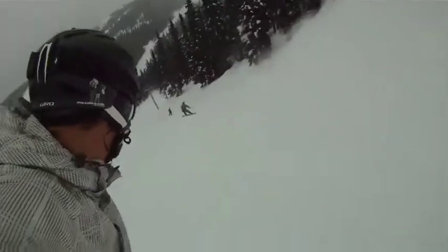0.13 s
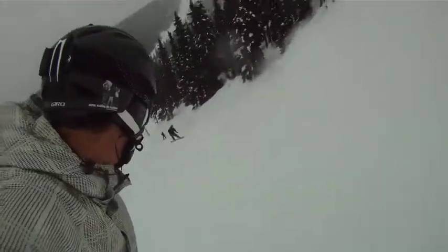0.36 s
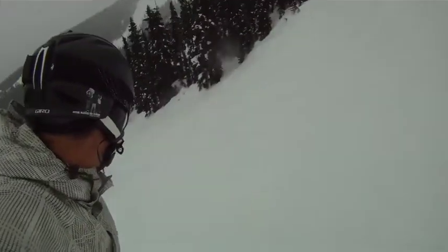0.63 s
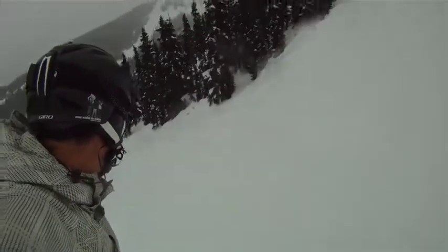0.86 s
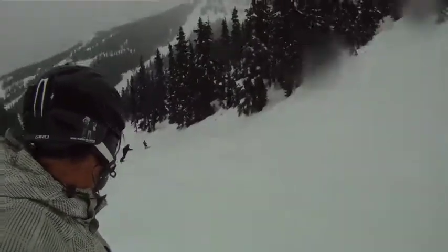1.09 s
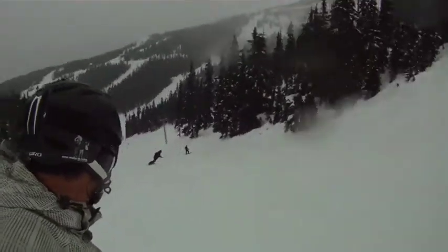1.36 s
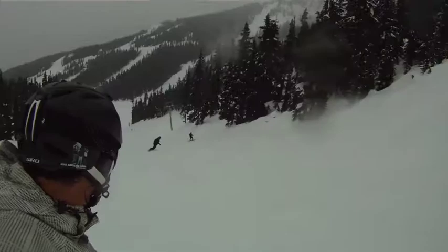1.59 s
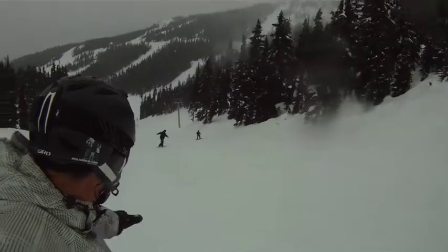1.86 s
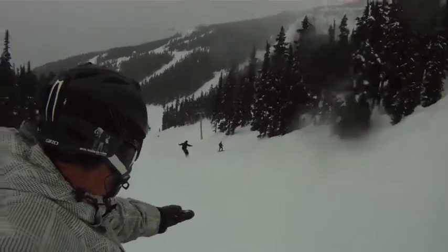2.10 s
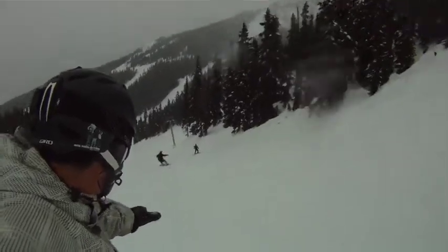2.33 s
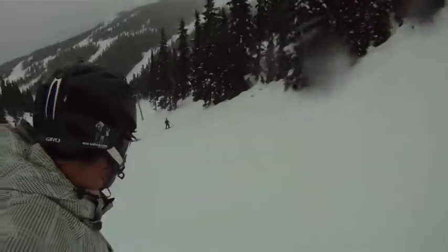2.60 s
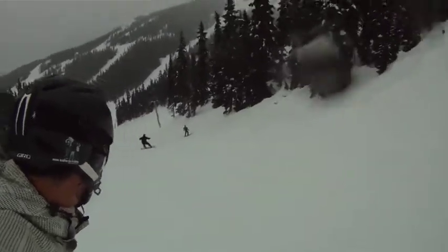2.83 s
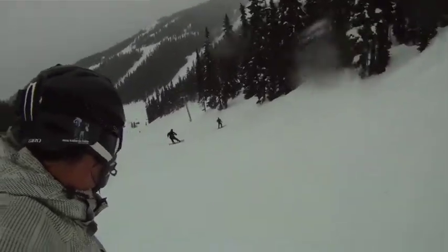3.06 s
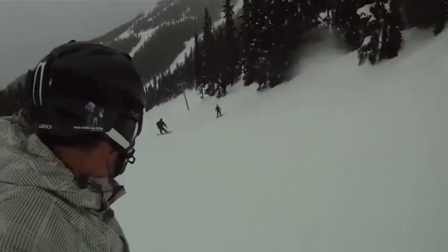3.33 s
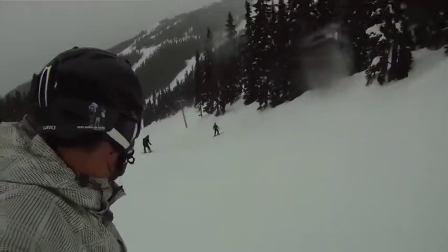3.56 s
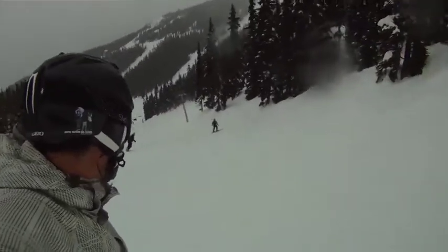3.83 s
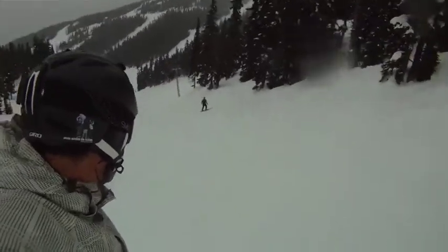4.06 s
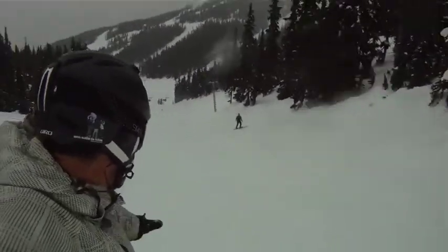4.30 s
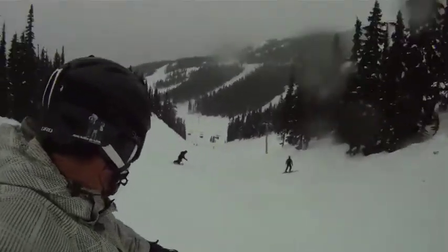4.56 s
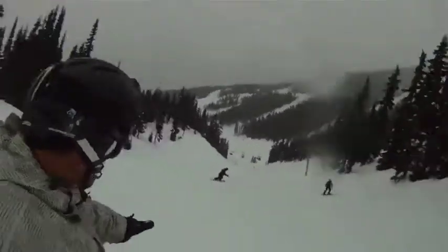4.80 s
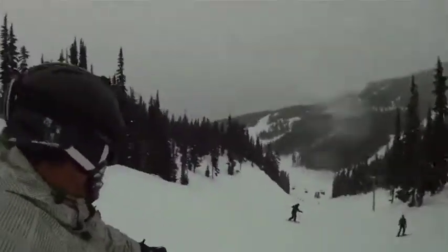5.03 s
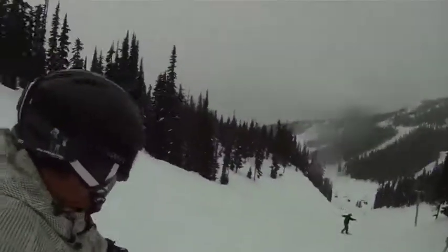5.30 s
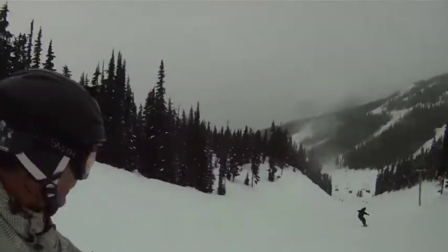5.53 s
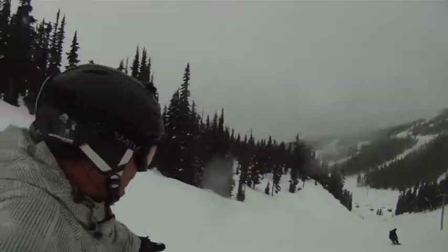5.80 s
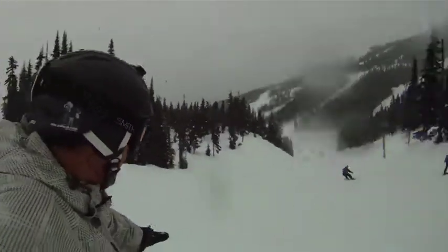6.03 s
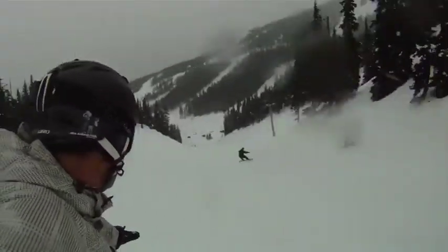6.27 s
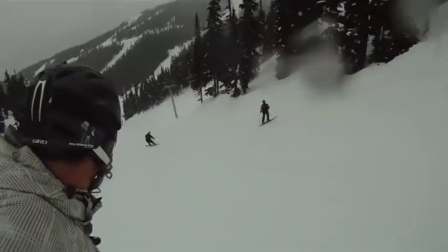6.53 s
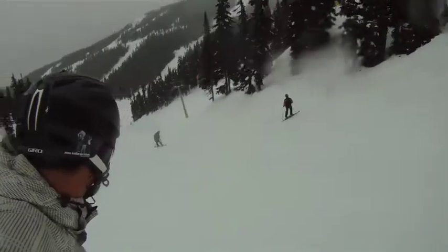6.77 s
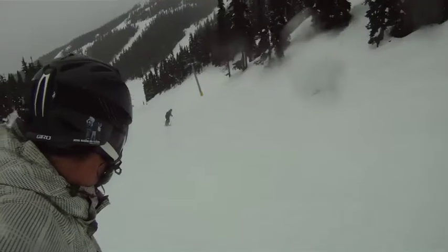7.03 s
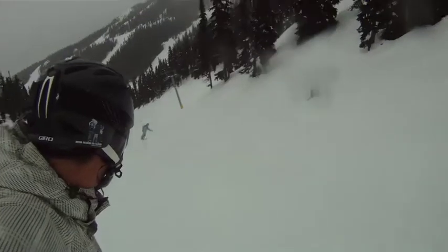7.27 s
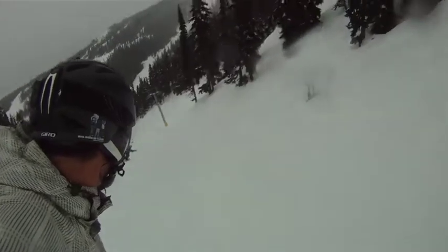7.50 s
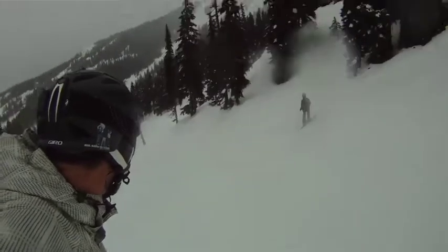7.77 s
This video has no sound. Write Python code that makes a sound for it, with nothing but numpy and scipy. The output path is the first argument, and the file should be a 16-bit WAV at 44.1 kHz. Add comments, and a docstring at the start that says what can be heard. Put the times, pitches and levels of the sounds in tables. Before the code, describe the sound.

A board edge slides over wet snow on an open mountain slope, picked up by a small camera in a closed case on a pole: mono, close, boxy, midrange-heavy and slightly harsh on top. From 0 to 0.9 s grainy scraping swells with low board jolts. It eases, with light ticks around 1 to 1.9 s, then a smooth hissing carve peaks near 2.2 s and drops abruptly. From 2.4 to 4 s the snow is quieter, with irregular plasticky clicks from the mount and a moderate scrape near 3.6 s. The strongest short, crunchy bites hit at 4.7 to 5.0 s, with a wind thump, and again at 5.7 to 5.9 s. A lull around 6.2 to 6.7 s leaves ticks and wind. From 7 s a coarser scrape builds, peaks near 7.5 s and starts easing at the end. Faint ice flecks, low rumble and hiss persist.

```python
"""On wet snow a board edge carves, heard by a small camera in a closed case on a pole.
Breaking snow crystals are random impulses over hiss, coloured by the resonances of the case.
The board rumbles in its bending modes, filtered noise is the wind on the case, struck resonances
are the ticks of the mount. The sound is sampled at 12 kHz and each sample is held, which
mirrors the spectrum around 12 kHz."""
import sys
import numpy as np
from scipy import signal
from scipy.io import wavfile

SR = 44100
rng = np.random.default_rng(int(sys.argv[2]) if len(sys.argv) > 2 else 0)


def boost(x):
    """Linear amplitude factor 10**(x/20) for a level x in decibels (scalar or array-like)."""
    u = np.asarray(x, float) / 20
    return 10 ** u


def unload_audio(sound):
    """Save the sound as a 16-bit wav file, at the path given as the first command line argument."""
    columns = np.transpose(np.atleast_2d(sound))
    # keep every value between -1 and 1, then stretch to whole-number steps
    steps = np.round(np.clip(columns, -1, 1) * 32767)
    wavfile.write(sys.argv[1], SR, steps.astype(np.int16))


N = 347508  # samples
BURST_STEP = 32  # samples between computed points of a burst
REFERENCE_CRUSH_DB = -42  # crush level at which board, spray and crackle have their own set levels


def unit_rms(x):
    """Normalization: scales a signal to an effective value of one."""
    return x / np.sqrt(np.mean(x ** 2) + 1e-20)


def in_time(rows):
    """Linear interpolation of each column over the time in the first one."""
    time_s, *columns = np.transpose(rows)
    return [np.interp(np.arange(N) / SR, time_s, column) for column in columns]


def cut(x, hz, kind, order):
    """Butterworth filtering: a maximally flat passband."""
    return signal.sosfilt(signal.butter(order, hz, kind, fs=SR, output="sos"), x)


def drift(rate_hz):
    """Low-pass random process: two equal poles smooth white noise, scaled to unit rms."""
    pole = np.exp(-2 * np.pi * rate_hz / SR)
    noise = rng.standard_normal(N + SR)
    smoothed = signal.lfilter([1], [1, -2 * pole, pole * pole], noise)
    return unit_rms(smoothed[SR:])  # without the first second, where the filter settles


def resonate(x, peaks):
    """Modal superposition: parallel two-pole resonances with alternating signs."""
    out = 0
    for k, (hz, width_hz, level_db) in enumerate(peaks):
        r = np.exp(-np.pi * width_hz / SR)
        poles = [1, -2 * r * np.cos(2 * np.pi * hz / SR), r * r]
        zeros = [(1 - r * r) / 2, 0, (r * r - 1) / 2]
        out = out + (-1) ** k * boost(level_db) * signal.lfilter(zeros, poles, x + 1e-18)
    return out


def patchy(x, peaks, swing_db, rate_hz):
    """Modulated excitation: changing snow feeds each resonance more or less strongly."""
    out = 0
    for k, peak in enumerate(peaks):
        feed = boost(swing_db * drift(rate_hz))
        out = out + (-1) ** k * feed * resonate(x, [peak])
    return unit_rms(out)


def grains(per_s, spread_db, clump_db, clump_rate_hz, hiss_gain):
    """Shot noise: snow crystals break at random, in clumps, over a smooth hiss."""
    sizes = boost(spread_db * np.minimum(rng.exponential(1, N), 3.5)) * rng.choice([-1, 1], N)
    breaks = unit_rms(sizes * (rng.random(N) < per_s / SR))
    clumps = boost(clump_db * drift(clump_rate_hz))
    return clumps * (breaks + hiss_gain * rng.standard_normal(N))


def full_rate(x):
    """Linear interpolation from the burst points to every sample."""
    return np.interp(np.arange(N), np.arange(0, N, BURST_STEP), x)


def swells(centre_s, peak_db, length_s):
    """Gaussian envelopes: bell-shaped bursts of power, one row each."""
    time_s = np.arange(0, N, BURST_STEP) / SR
    offset = (time_s - centre_s[:, None]) / length_s[:, None]
    return boost(2 * peak_db)[:, None] * np.exp(-(2.28 * offset) ** 2)


def with_bursts(steady_db, rows):
    """Incoherent addition: gain of a steady level with bursts added in power."""
    bursts = swells(*np.transpose(rows)).sum(axis=0)
    return np.sqrt(boost(2 * steady_db) + full_rate(bursts))


def own_hiss():
    """Amplifier noise: an even part and a part that is stronger in the lows."""
    even, dull = rng.standard_normal((2, N))
    return boost(-67.5) * even + boost(-65.0) * unit_rms(cut(dull, 740.0, "low", order=1))


# steady wind on the case: time_s [s], level_db [dB]
WIND_LEVEL = [(0, -49.5), (.6, -51), (1.5, -55), (2.4, -54.5), (2.9, -47.5), (3.6, -49), (3.8, -55),
              (4.6, -52), (5.1, -48), (5.3, -50), (6.0, -51.5), (6.6, -55.5), (7.2, -51), (7.88, -55)]
# gusts on top of the steady wind: centre_s [s], peak_db [dB], length_s [s]
WIND_GUSTS = [(.04, -48.5, 0.09), (0.305, -52, .05), (.5, -48, .06), (.92, -49, .05), (1.01, -58, .05),
              (1.445, -53, 0.038), (2.503, -47.5, 0.036), (4.775, -42, 0.11), (5.12, -48, 0.046),
              (5.51, -50, .06), (6.42, -50, 0.054), (6.72, -49, 0.076), (7.07, -58, 0.042),
              (7.203, -45, .05), (7.5, -51, 0.12)]


def wind():
    """Turbulent pressure: low-passed noise with a fluctuating level and gusts."""
    level_db, = in_time(WIND_LEVEL)
    turbulence = boost(1.5 * drift(8.4)) * rng.standard_normal(N)
    pressure = cut(cut(turbulence, 19.0, "low", order=1), 207.0, "low", order=1)
    return with_bursts(level_db, WIND_GUSTS) * unit_rms(cut(pressure, 6.4, "high", order=2))


# bending modes of the board: pitch_hz [Hz], width_hz [Hz], relative level_db [dB]
BOARD_MODES = [(155, 156, -3), (272, 145, 1.5), (387, 180, -3.5), (560, 200, -12.5)]
# jolts that shake the board: centre_s [s], peak_db [dB], length_s [s]
BOARD_JOLTS = [(.04, -55, 0.22), (0.325, -53.5, 0.066), (.59, -43, 0.037), (0.717, -47.5, 0.21),
               (0.815, -46, 0.04), (.96, -56.5, .04), (1.07, -59, 0.12), (2.5, -57, .03), (2.82, -61, .05),
               (3.05, -63, .06), (3.547, -54, 0.19), (3.72, -56, 0.087), (4.674, -43.5, 0.032),
               (4.832, -49.5, 0.069), (5.227, -54, .05), (5.376, -59, .05), (5.504, -52.5, 0.035),
               (5.727, -51, .05), (5.9, -54, 0.054), (6.404, -65, .05), (7.064, -51.5, .05),
               (7.2, -50, 0.059), (7.42, -51, 0.2)]


def board_rumble(crush_db, coarse_db):
    """Forced bending vibration: pressure, coarse snow and jolts drive the board."""
    level_db = -48 + 0.71 * (crush_db - REFERENCE_CRUSH_DB) + 1.29 * coarse_db
    bending = resonate(grains(300.0, 4.1, 1.15, 14.0, 1.33), BOARD_MODES)
    return with_bursts(level_db, BOARD_JOLTS) * unit_rms(bending)


def struck(start_s, level_db, centre_hz, peaks, focus_db, rattle_gain, rattle_s):
    """Impact excitation: a contact and its uneven rattle ring the resonances.

    focus_db is the loss per octave between the contact's centre and a resonance."""
    length = 600  # samples
    decay = np.exp(-np.arange(length) / (rattle_s * SR))
    contact = rattle_gain * rng.standard_normal((len(start_s), length)) ** 3 * decay
    contact[:, 0] = 1
    at = np.round(start_s * SR).astype(int)[:, None] + np.arange(length)
    at = np.minimum(at, N - 1)
    out = 0
    for k, (hz, width_hz, peak_db) in enumerate(peaks):
        strength_db = level_db - focus_db * np.abs(np.log2(centre_hz / hz))
        force = np.zeros(N)
        np.add.at(force, at, contact * boost(strength_db)[:, None])
        # through the case wall into its air: two resonances in a row, a ring that swells first
        wall = resonate(force, [(hz, 7.8 * width_hz, 0)])
        out = out + (-1) ** k * resonate(wall, [(hz, width_hz, peak_db)])
    return out


# ticks of the mount, levels before the gains below:
# start_s [s], bright_db [dB], bright pitch_hz [Hz], dull_db [dB]
MOUNT_TICKS = [(0.9333, -32, 3300, -37), (1.0091, -38, 3480, -39), (1.2035, -39, 3700, -55),
               (1.4157, -51, 4210, -53), (1.511, -41.5, 3660, -45), (1.6125, -42, 3840, -48),
               (1.723, -44, 3850, -45), (1.836, -34.5, 3570, -40), (1.854, -32.5, 4840, -50),
               (2.3436, -48, 3730, -37), (2.41, -44, 4660, -49), (2.435, -27, 2900, -37),
               (2.4633, -52, 3080, -35), (2.5044, -47, 3800, -39.5), (2.511, -41.5, 5350, -57),
               (2.5247, -47, 3060, -57), (2.731, -57, 3400, -50), (2.751, -41, 4360, -38),
               (2.7572, -26, 3480, -50), (2.884, -40, 4400, -40), (3.0112, -49, 3630, -41),
               (3.0616, -40, 5000, -38.5), (3.0901, -40, 3320, -29), (3.1454, -37, 3350, -48),
               (3.157, -48, 3070, -42), (3.171, -44, 4600, -50), (3.185, -36, 3500, -44.5),
               (3.258, -37, 3500, -50), (3.2992, -47, 3800, -34), (3.342, -37, 4400, -36),
               (3.449, -38, 4500, -42), (3.545, -29.5, 3280, -31.5), (3.565, -39, 3540, -45),
               (3.7337, -38, 3730, -36), (3.861, -40, 3950, -47), (3.888, -37.5, 4800, -38),
               (3.951, -47, 3450, -35.5), (4.116, -46, 3500, -50), (4.4647, -28.5, 5140, -36.5),
               (4.4913, -35, 3410, -41), (4.5372, -39.5, 3420, -50), (4.795, -32, 3400, -30),
               (4.9484, -27.5, 3450, -38), (5.0942, -36, 3990, -53), (5.115, -48, 3050, -50),
               (5.1402, -38, 4640, -49), (5.167, -42, 4050, -40), (5.663, -36, 3000, -43),
               (5.8401, -39, 3450, -46), (5.9988, -36.5, 3120, -52), (6.225, -48, 3120, -39),
               (6.33, -29.5, 4530, -41), (6.433, -34, 3420, -39), (6.5578, -62, 3240, -46),
               (6.577, -51, 3900, -55), (6.6055, -43.5, 3690, -49), (6.6504, -46, 3550, -48),
               (6.6923, -55, 3530, -39.5), (6.784, -43, 3530, -40), (6.796, -36.5, 4500, -48)]
# resonances of the case, main, lower and upper: pitch_hz [Hz], width_hz [Hz], relative level_db [dB]
MAIN_CASE = [(1754, 690, -7.5), (2308, 526, 5), (2775, 180, -13)]
LOWER_CASE = [(873, 214, -7.5), (1059, 71, -3.5), (1388, 139, 3)]
UPPER_CASE = [(2940, 1900, -12.5), (3550, 830, 0.5), (4550, 342, 3.5), (4806, 620, 0.5), (5525, 1020, -5)]


def ticks():
    """Modal ringing after impact: each tick of the mount has a bright and a dull part."""
    start_s, bright_db, pitch_hz, dull_db = np.transpose(MOUNT_TICKS)
    bright = struck(start_s, bright_db + 24.5, pitch_hz, UPPER_CASE, 22.5, 0.05, 0.0022)
    dull = struck(start_s, dull_db + 27, 1740.0, LOWER_CASE + MAIN_CASE, 6.3, 0.038, 0.0017)
    return bright + dull


def snap():
    """Broadband impulse: each tick of the mount starts with a dry snap that does not ring."""
    start_s, bright_db, _, dull_db = np.transpose(MOUNT_TICKS)
    force = np.zeros(N)
    force[np.round(start_s * SR).astype(int)] = boost(np.maximum(bright_db, dull_db) - 1)
    return cut(force + 1e-18, [1500.0, 6000.0], "band", order=1)


def ice_flecks():
    """Random impacts: 260 faint flecks of ice hit the case, evenly likely at any time."""
    when, size, pitch = rng.random((260, 3)).T
    level_db = -27 - 5.3 * np.log(size + 0.035)
    pitch_hz = 1400 * 3.8 ** pitch
    peaks = LOWER_CASE + MAIN_CASE + UPPER_CASE
    return struck(when * N / SR, level_db, pitch_hz, peaks, 43.0, 0.019, 0.0016)


def crackle(crush_db):
    """Sparse shot noise: single hard grains snap in the main and upper resonances."""
    snaps = resonate(grains(120.0, 5.6, 2.5, 7.7, 0.0), MAIN_CASE + UPPER_CASE)
    level_db = -59.5 + 0.69 * (crush_db - REFERENCE_CRUSH_DB)
    return boost(level_db) * unit_rms(snaps)


# puffs of spray blown against the case: centre_s [s], peak_db [dB], length_s [s]
SPRAY_PUFFS = [(0.217, -47, .02), (0.348, -42, 0.045), (1.207, -50, 0.0099), (2.755, -54, .02),
               (3.08, -65, 0.028), (3.18, -55, 0.057), (3.335, -52, 0.029), (3.45, -55, 0.03),
               (3.567, -59, 0.037), (3.956, -46.5, 0.025), (4.19, -50.5, 0.039), (4.33, -51, .04),
               (4.487, -53, .05), (4.7, -54, 0.025), (4.79, -44, 0.02), (4.878, -50, 0.025),
               (5.055, -47, 0.019), (5.14, -55, 0.038), (5.387, -48.5, 0.049), (5.845, -48, 0.02),
               (6.233, -54, 0.02), (6.437, -63, 0.028), (6.805, -57, 0.036)]


def spray(crush, crush_db, coarse_db):
    """Granular excitation: fine spray grows with the crush, flickers and comes in puffs."""
    fine = 0.35 * crush + grains(760.0, 3.0, 1.5, 52.0, 2.25)
    level_db = -49.5 + 0.76 * (crush_db - REFERENCE_CRUSH_DB) + 0.34 * coarse_db
    level_db = level_db + 0.5 * drift(7.0)
    return with_bursts(level_db, SPRAY_PUFFS) * patchy(fine, UPPER_CASE, 0.94, 40.0)


# edge pressure through the turns: time_s [s], crush level_db [dB], coarseness of the snow [dB]
EDGE_PRESSURE = [(0, -57, -9), (.2, -48.5, -10), (.36, -39.5, -7), (.55, -40, -6), (.7, -37, -4),
                 (.81, -43.5, -7), (.92, -50.5, -5), (1.27, -53, -10.5), (1.45, -48, -13), (1.8, -51, -9.5),
                 (1.9, -46, -14), (1.94, -38.5, -12.5), (2.19, -32.5, -14.5), (2.27, -39, -12.5),
                 (2.37, -54, -7), (2.61, -56.5, -9.5), (2.9, -54, -2), (3.12, -52.5, -5), (3.3, -46.5, -8),
                 (3.55, -43.5, -3), (3.62, -38, -8.5), (3.74, -42.5, -7.5), (3.86, -52, -7.5),
                 (4.0, -48, -7.5), (4.15, -51.5, -5), (4.3, -45.5, -11), (4.52, -49.5, -9.5),
                 (5.3, -49.5, -8.5), (5.5, -45, -12.5), (5.8, -45, -8.5), (6.1, -43.5, -13),
                 (6.15, -50.5, -12.5), (6.39, -58, -6.5), (6.58, -61.5, -6), (6.8, -48, -8),
                 (6.91, -49.5, -6.5), (7.0, -42, -10.5), (7.3, -41.5, -5), (7.45, -39, -5.5),
                 (7.64, -37.5, -7.5), (7.88, -45, -6.5)]
# the edge skips and bites on bumps: centre_s [s], peak_db [dB], length_s [s], coarseness [dB]
EDGE_BITES = [(.08, -40.5, 0.17, -6.5), (0.316, -38, 0.097, -13.5), (.66, -45.5, .03, -13),
              (0.712, -40, .03, -19), (0.956, -48, .03, -8), (2.478, -47.5, 0.065, -24),
              (3.06, -55, .04, -5), (3.212, -41.5, 0.038, -9), (3.322, -45.5, .04, -9),
              (3.36, -46, 0.17, -1), (3.488, -41.5, 0.017, -7), (4.377, -37.5, 0.11, -11),
              (4.57, -52.5, .025, 3), (4.582, -50, 0.022, -5), (4.671, -26, 0.045, -8.5),
              (4.833, -24.5, 0.056, -11), (4.944, -35.5, 0.065, -13), (5.009, -28, 0.052, -11),
              (5.244, -38, 0.041, -8), (5.541, -39.5, 0.052, -9), (5.609, -41.5, 0.038, -11),
              (5.683, -32, 0.023, -14.5), (5.726, -31.5, 0.077, -14.5), (5.856, -34.5, 0.054, -20),
              (5.901, -28, 0.026, -16), (5.942, -37, 0.056, -13), (6.056, -49, .08, -15),
              (6.467, -48, 0.094, -12), (7.355, -40.5, 0.047, -10), (7.403, -37.5, .04, -3.5),
              (7.48, -37, .04, -11)]


def edge():
    """Power addition: bites add to steady pressure, power weights set the coarseness."""
    steady_db, steady_coarse_db = in_time(EDGE_PRESSURE)
    centre_s, peak_db, length_s, bite_coarse_db = np.transpose(EDGE_BITES)
    bites = swells(centre_s, peak_db, length_s)
    steady = boost(2 * steady_db)
    power = steady + full_rate(bites.sum(axis=0))
    coarse_db = (steady * steady_coarse_db + full_rate(bite_coarse_db @ bites)) / power
    return 10 * np.log10(power), coarse_db


def carving(crush_db, coarse_db):
    """Granular fracture: crushing fills the main resonances, coarse lumps the lower, spray the upper."""
    crush = grains(1800.0, 2.74, 1.0, 28.0, 1.0)
    lumps = 0.63 * crush + grains(500.0, 2.6, 0.77, 39.0, 0.73)
    main = cut(patchy(crush, MAIN_CASE, 0.74, 4.7), [1300.0, 3100.0], "band", order=3)
    # coarseness is the level of the lumps relative to the main crush
    body = unit_rms(main) + boost(coarse_db) * patchy(lumps, LOWER_CASE, 2.0, 11.0)
    return boost(crush_db) * body + spray(crush, crush_db, coarse_db)


def scene():
    """Superposition: the edge pressure drives snow and board, the other sources add to them."""
    crush_db, coarse_db = edge()
    background = own_hiss() + wind() + board_rumble(crush_db, coarse_db)
    impacts = ticks() + snap() + ice_flecks()
    snow = crackle(crush_db) + carving(crush_db, coarse_db)
    return (background + impacts + snow)[None]


def low_pass(x):
    """Removes everything above the highest recorded frequency."""
    return signal.sosfilt(signal.butter(12, 16510, fs=SR, output="sos"), x)


def record(dry):
    """Zero-order hold: slow samples held without smoothing leave mirror images, cut at the top."""
    hold_hz, input_cut_hz, top_hz = 12000, 5750, 14900
    slow = signal.resample_poly(cut(dry, input_cut_hz, "low", order=6), hold_hz, SR, axis=1)
    steps = np.repeat(slow, 4, axis=1)  # each sample held for four steps at 48 kHz
    held = signal.resample_poly(steps, SR, 4 * hold_hz, axis=1)[:, :N]
    mix = signal.sosfilt(signal.ellip(10, .5, 45, top_hz, fs=SR, output="sos"), held)
    return low_pass(mix)


dry = scene()
out = record(dry)
unload_audio(out)
```